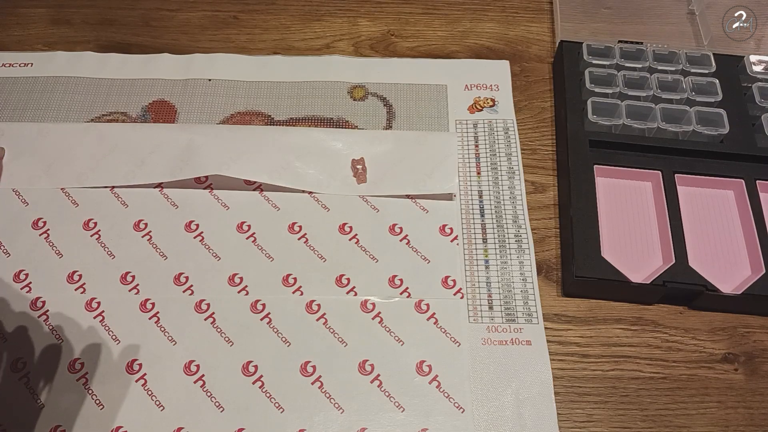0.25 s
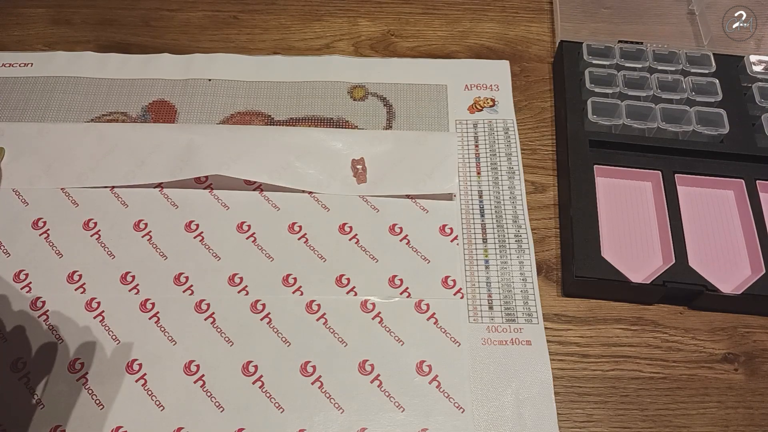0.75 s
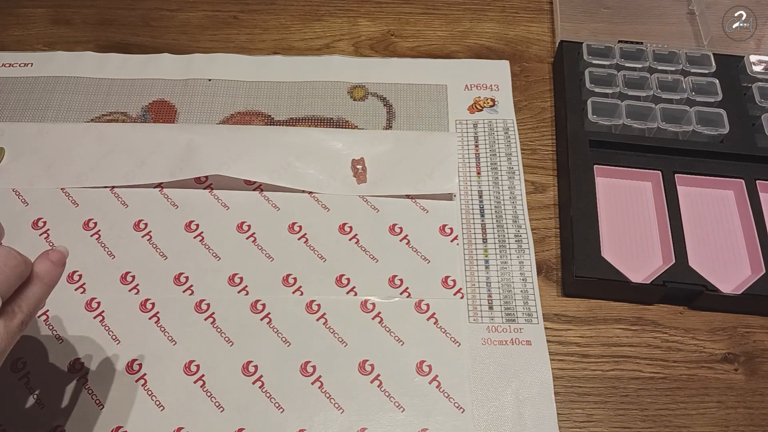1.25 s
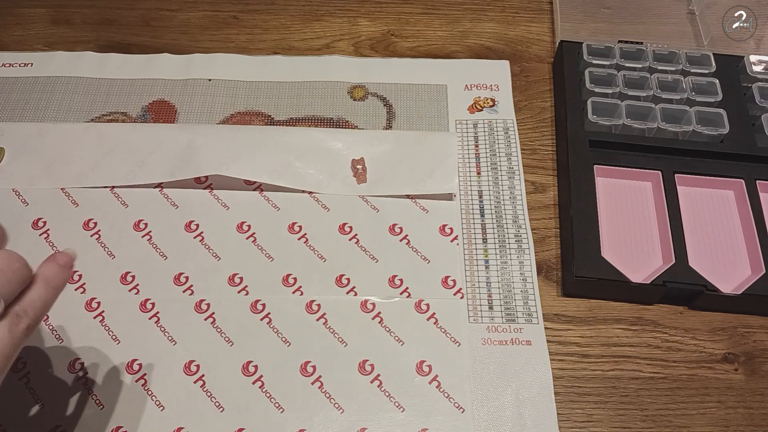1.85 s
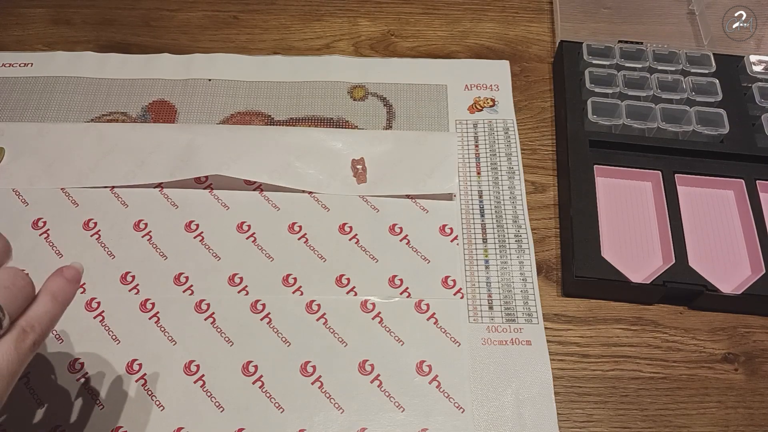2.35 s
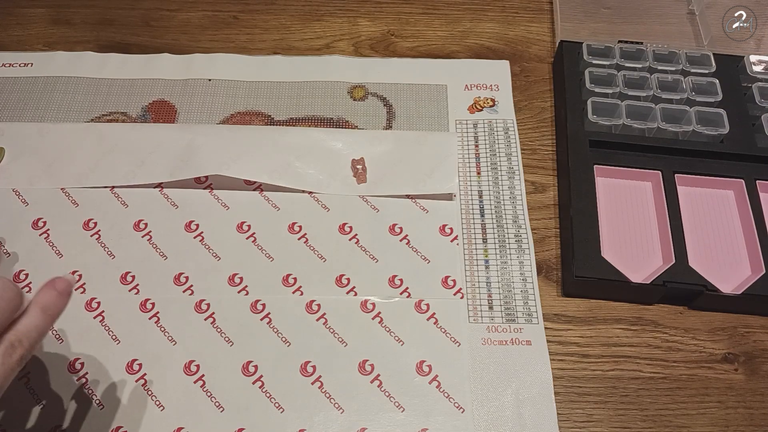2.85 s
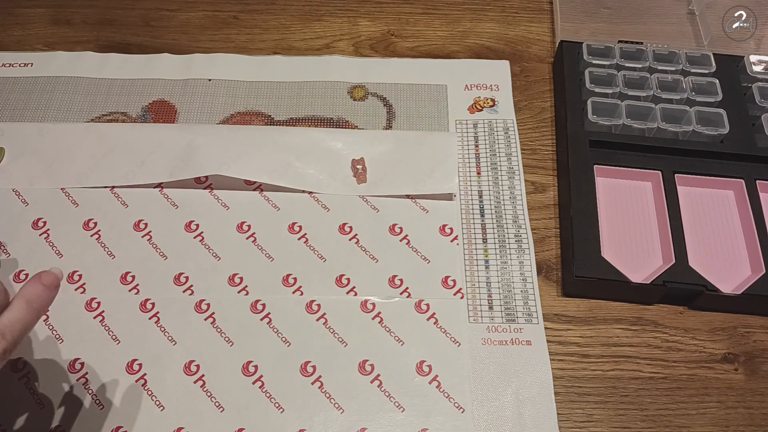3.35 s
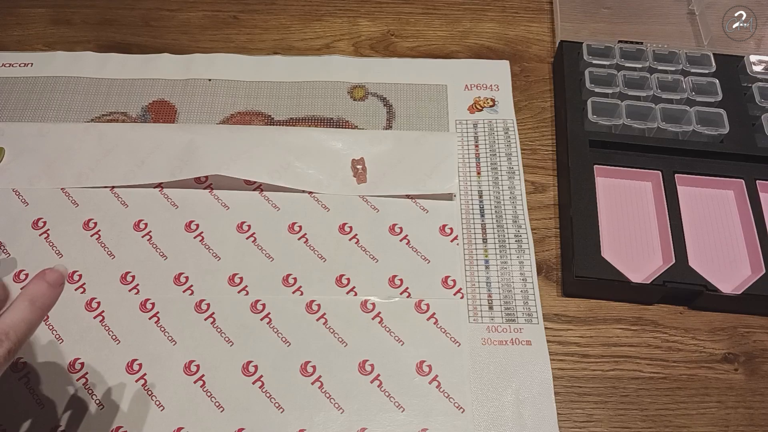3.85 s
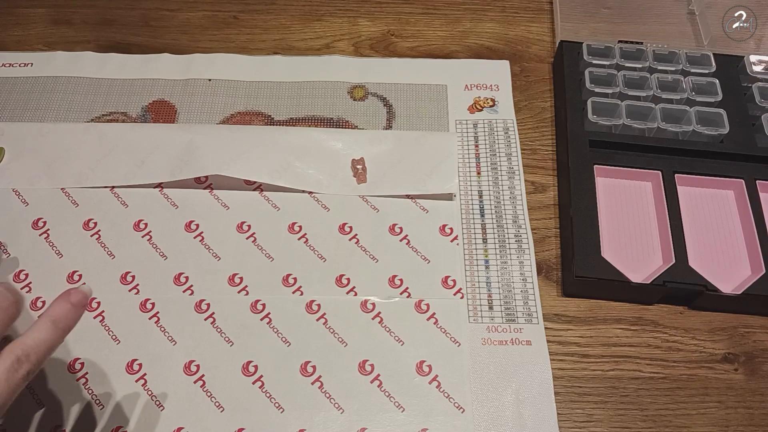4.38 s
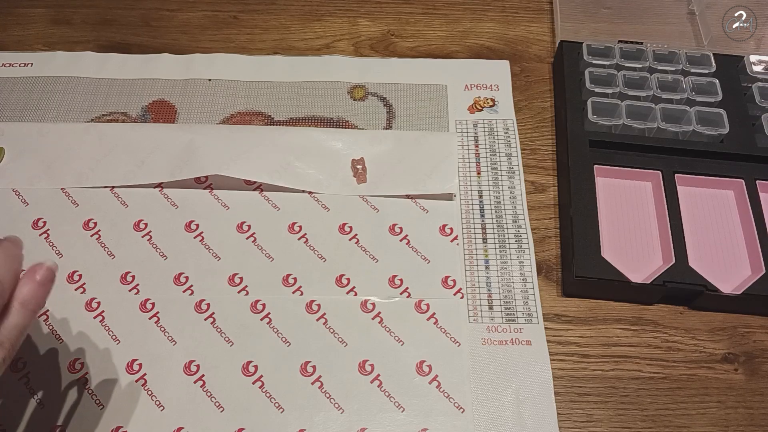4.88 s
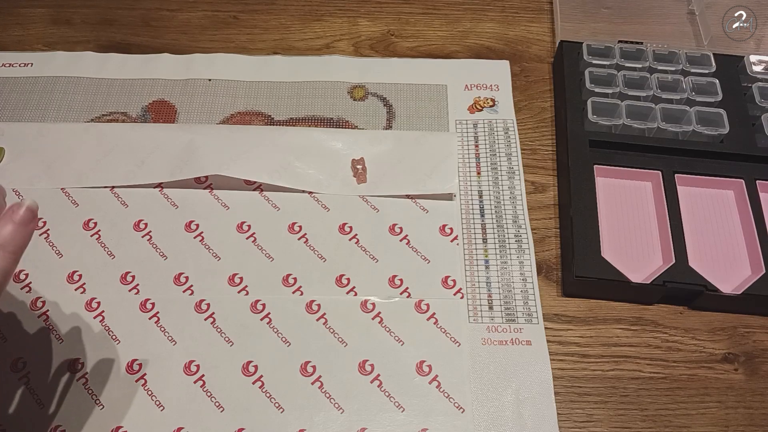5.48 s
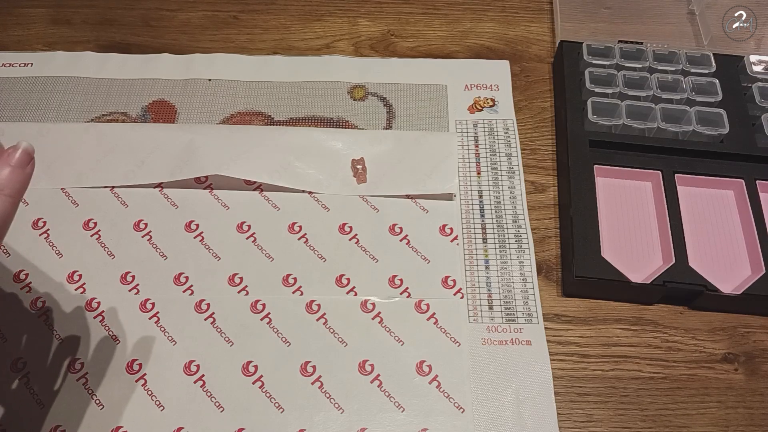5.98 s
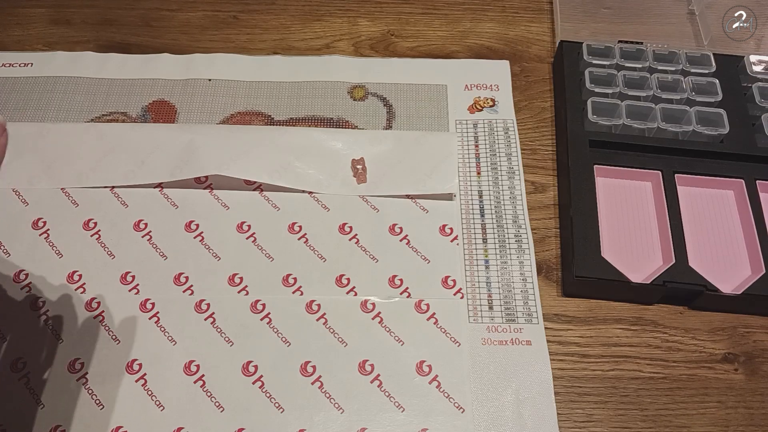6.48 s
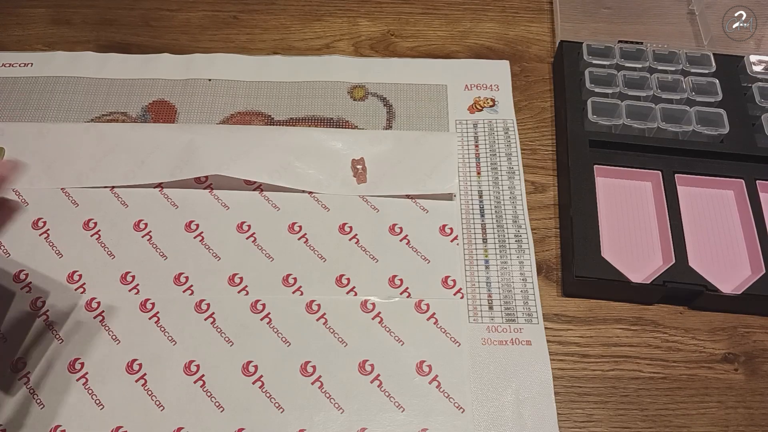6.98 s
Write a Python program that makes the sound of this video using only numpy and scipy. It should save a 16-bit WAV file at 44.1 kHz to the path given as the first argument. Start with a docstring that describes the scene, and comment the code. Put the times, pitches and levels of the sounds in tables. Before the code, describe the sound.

In a quiet room, small hard beads rattle in a shallow plastic tray, picked up close in stereo, slightly off to one side. From 0 to 0.7 s the rattle is light and uneven, with a few separate ticks; between 0.7 and 1.0 s single beads drop and patter. From about 1.1 s the shaking becomes vigorous: dense, bright, crisp clatter in overlapping strokes roughly eight to ten a second, with small plastic taps from tray floor and walls, peaking near 3.0 s. It drops briefly around 4.4 to 4.7 s, then surges again, strongest near 5.1 to 5.2 s. From 5.5 s it weakens, nearly stopping by 6.5 s; a few faint ticks and tiny rustles follow from 6.9 to 7.2 s. Throughout, a faint low motor hum with rumbling air swells about once a second beneath soft, flickering hiss.

```python
"""Rattling plastic beads are the loudest sound: a hand shakes them in a plastic tray, off to one side of two
mic ports. The heap is random contacts, dense on every stroke, each a short noise burst coloured by bead and tray.
Single beads drop in the pauses, each a tick, a tap on the tray and a dull knock in the table.
In another corner of the room a motor hums: sine orders of its turn rate and rumbling air, swelling about
once a second. Faint, flickering room hiss lies under it all."""
import sys
import numpy as np
from scipy import signal
from scipy.fft import rfft, irfft, next_fast_len
from scipy.io import wavfile
from scipy.ndimage import uniform_filter1d, map_coordinates

SR = 44100
rng = np.random.default_rng(int(sys.argv[2]) if len(sys.argv) > 2 else 0)


def wav_record(signal):
    """Record a signal, one row per channel, as 16-bit PCM in the file named by sys.argv[1]."""
    frames = np.transpose(np.atleast_2d(signal))
    bounded = np.clip(frames, -1, 1)
    # unit amplitude maps onto the largest positive 16-bit level
    quanta = np.round(bounded * 32767).astype(np.int16)
    wavfile.write(sys.argv[1], SR, quanta)


N = 318822  # samples

# Strokes of the hand that throw the heap across the tray: crest t/s, relative tick level/dB, settling time/s
HAND_STROKES = [(0.022, -43, 0.11), (0.1, -50, 0.025), (0.211, -46, 0.032), (0.323, -48.5, 0.097),
                (0.401, -46, 0.039), (0.529, -49.5, 0.049), (0.596, -41.5, 0.04), (0.645, -41.0, 0.058),
                (0.78, -52.5, 0.095), (1.012, -42, 0.074), (1.117, -35, 0.052), (1.21, -36, 0.11),
                (1.374, -36, 0.17), (1.492, -42.5, 0.054), (1.64, -35.5, 0.29), (1.79, -38.5, 0.2),
                (1.905, -38, 0.033), (1.985, -36.5, 0.14), (2.174, -37, 0.15), (2.256, -36.5, 0.053),
                (2.323, -36.5, 0.21), (2.513, -35.5, 0.063), (2.637, -35.5, 0.082), (2.819, -38, 0.2),
                (2.95, -41, 0.16), (3.039, -32.5, 0.15), (3.161, -37, 0.065), (3.271, -36.5, 0.053),
                (3.35, -40.5, 0.069), (3.515, -35.5, 0.14), (3.633, -35, 0.13), (3.728, -37, 0.031),
                (3.779, -39, 0.03), (3.861, -38.5, 0.14), (3.992, -38, 0.11), (4.084, -38, 0.101),
                (4.207, -37.5, 0.12), (4.312, -41, 0.085), (4.425, -52, 0.029), (4.534, -53, 0.035),
                (4.69, -49, 0.18), (4.742, -46, 0.034), (4.853, -37.5, 0.11), (4.974, -39.5, 0.084),
                (5.085, -34, 0.067), (5.195, -33, 0.067), (5.31, -37, 0.064), (5.422, -37.5, 0.048),
                (5.526, -40, 0.057), (5.65, -41.5, 0.058), (5.77, -41.5, 0.058), (5.87, -45.8, 0.074),
                (6.0, -51.5, 0.11), (6.117, -49, 0.074), (6.211, -50, 0.066), (6.318, -53.5, 0.118),
                (6.51, -61.7, 0.084), (6.683, -60, 0.055), (6.87, -66, 0.023), (6.932, -50, 0.011),
                (7.005, -55, 0.08), (7.078, -51.5, 0.024), (7.142, -57.5, 0.09), (7.224, -50.7, 0.026)]
# How firmly the heap meets the tray: t/s, then relative level over the ticks/dB of
# floor taps, wall taps and the lowest ring of the tray
TRAY_LOAD = [(0, -6.5, -4.5, -19), (.14, -17.5, -11, -36), (.54, -20, -13.5, -39), (.66, -12, -13, -38),
             (.85, -4.5, -5.5, -28), (1.03, -14, -8.5, -51), (1.12, -5, -9.5, -30.5), (1.7, -7, -8, -24),
             (2.75, -6, -8.5, -24), (3.05, -5.5, -8.5, -21.5), (3.4, -10, -8, -29.5),
             (3.6, -7.5, -8.5, -19.5), (4.3, -7.5, -8.5, -24.5), (4.45, -6, -9.5, -31),
             (4.6, -13.5, -12, -36), (4.8, -8.5, -7, -40), (5.15, -8.5, -6, -24), (5.8, -11.5, -9.5, -29.5),
             (5.92, -20, -11.5, -28), (6.5, -20.5, -15, -30), (6.9, -20, -12, -23), (6.95, -25, -9.5, -24),
             (7.23, -19, -16.5, -25)]
# Single dropped beads: t/s, relative level/dB, tray tap over the tick/dB, dull knock over the tick/dB
BEAD_DROPS = [(0.039, -27, -14, -50), (0.0662, -30, -26, -39), (0.105, -25.5, -22, -44),
              (0.2073, -36, -29, -40), (0.5893, -30, -27, -50), (0.7024, -37, -17, -33),
              (0.7435, -30, -11, -39), (0.765, -32.5, -17, -42), (0.7707, -34, -7, -36),
              (0.7984, -32, -14, -35), (0.8064, -40, -20, -32), (0.811, -31, -14, -29),
              (0.8344, -43, -10, -33), (0.8604, -37, -14, -37), (0.879, -37, -14, -36.5),
              (0.884, -30.5, -12, -39), (0.9198, -32.5, -28, -40), (0.9383, -43, -14, -34),
              (1.0364, -26.5, -5, -45), (1.084, -26, -21, -27), (5.3981, -40, -19, -39),
              (5.5223, -37, -25, -50), (6.57, -42, -37, -33), (6.9231, -30, -32, -20),
              (7.0115, -43, -34, -38), (7.0672, -39, -24, -15), (7.213, -36.5, -29, -32)]

# Colour at each port, as relative spectra: f/Hz, left level/dB, right level/dB
TICK_COLOUR = [(3500, -57, -40), (5080, -7, -6.5), (6250, -2.5, -4.5), (7380, -4, 0.5), (8350, -1, -8),
               (9100, -1.5, -5), (11030, -2.5, -6), (11650, 0, -1), (13100, 2.5, -3), (14400, -1.5, -2.5),
               (15800, -0.5, -3.5)]  # bead on bead
FLOOR_COLOUR = [(1700, -42.5, -54), (1900, -36, -29), (2067, -14.5, -10), (2435, -3, -17.5),
                (2546, 1.5, -5.5), (2926, -2.5, -3.5), (3220, -15, -2.5), (3590, -15, -9), (4250, -37, -44)]  # bead on the tray floor
WALL_COLOUR = [(2800, -54.5, -37.5), (3480, -5.5, -3.5), (3860, -1.5, -5), (4600, -0.5, -1.5),
               (5170, -3, -2), (5730, -24, -6.5), (7100, -37, -34)]  # bead on the tray wall
RING_COLOUR = [(1430, -56, -53), (1660, -25, -18.5), (1795, -10.5, -2.5), (1880, 1, -0.5),
               (2230, -7.5, -10), (2630, -35, -41)]  # lowest ring of the tray
KNOCK_COLOUR = [(300, -40, -40), (700, -30, -11), (1500, 8, 4), (2300, 5, 2), (3500, -30, -36)]  # table under the tray
RUMBLE_COLOUR = [(12, -18, -30), (25, -24, -17), (44, -2, -15), (72, 2.5, 6.5), (111, -1, -13),
                 (174, -10, -22.5), (274, -13, -22), (319, -17, -31), (457, -32.5, -25.5), (900, -66, -70)]  # air noise of the motor
HISS_COLOUR = [(100, 3, -18), (298, 0, -1), (546, 5, 2.5), (1140, 2, 0.5), (2470, 1, 1.5), (5130, -29, -38),
               (10100, 0.5, -10), (15200, -11, -18)]  # air noise of the room

# Likeness of the bead sound at the two ports: f/Hz, likeness (0-1)
PORT_LIKENESS = [(1800, 0.43), (2200, 0.76), (2900, 0.7), (3400, 0.28), (4800, 0.58), (6200, 0.21),
                 (7000, 0.9), (8100, 0.8), (8800, 0.43), (10200, 0.52), (10800, 0.8), (11300, 0.9),
                 (13600, 0.76), (16000, 1)]
# Phase of the left port against the right: f/Hz, phase/rad
PORT_PHASE = [(100, 0), (1120, -1), (1640, -3), (2330, -3.2), (3100, -6.8), (3530, -5.4), (4220, -8.1),
              (5770, -10.5), (6290, -10), (6980, -4 * np.pi), (16200, -4 * np.pi)]

# Motor orders: multiple of the turn rate, left and right rms level/dB before the motor gain,
# swell depth (0-1), polarity
MOTOR_ORDERS = [(1, -61, -66, .25, 1), (2, -56, -64, .25, 1), (3, -49, -57, .3, 1), (4, -62, -71, .25, -1)]
# Steady tone one swell rate below the third order: left and right rms level/dB before the motor gain
BEAT_LEVELS = (-57, -76)
# Background levels over time: t/s, motor gain/dB, hiss level/dB
ROOM_LEVELS = [(0, -0.5, -69), (.9, -1, -70), (1.5, 1.5, -65), (2.2, -1, -66), (3.2, 1.5, -69.5),
               (4, 0.5, -81), (4.7, -3, -71), (5.2, .5, -76), (6, -1.5, -71), (6.9, -2, -70),
               (7.23, -3, -69)]

RISE_SHARE = 0.72  # time scale of a surge's rise, as a share of its settling time
STIR_DB = -69.5  # faint trickle between strokes
# Contact rate at a tick level of REFERENCE_DB, and its exponential growth with harder shaking
CONTACTS_PER_S, REFERENCE_DB, BUSIER_PER_DB = 1900, -41.5, 0.0166
TURN_HZ, SWELL_HZ, SWELL_TOP_S = 24.088, 1.025, 0.341  # turn rate, swell rate, time of a swell's top
RUMBLE_DB = -60.5  # air rumble before swell and motor gain
TOP_HZ = 15740  # upper band limit


def beads():
    """The heap rattles with the shaking; its contacts also tap the tray's floor and walls and ring its body."""
    tick_db = surges()
    floor_db, wall_db, ring_db = curves(TRAY_LOAD)
    busy = CONTACTS_PER_S * np.exp(BUSIER_PER_DB * (tick_db - REFERENCE_DB))
    clumps = amp(2 * 0.62 * wobble(30))  # beads arrive in bunches
    shared = contacts(busy, spread_db=1.0)

    def some(part):
        """Energy of the shared contacts, plus a sparser and more uneven set of one surface's own."""
        own = contacts(part * busy, spread_db=4.0)
        return clumps * (0.53 * shared + 0.48 * own)

    snap = dict(rise=0.0001, t60=0.0035, tail_db=-0.8, tail_t60=0.07)
    ticks = dying(amp(2 * tick_db) * some(0.95), **snap)
    floor = dying(amp(2 * (tick_db + floor_db + 1.22)) * some(0.3),
                  rise=0.00026, t60=0.0055, tail_db=-0.064, tail_t60=0.12)
    walls = dying(amp(2 * (tick_db + wall_db + 2.0)) * some(0.55), **snap)
    ring = dying(amp(2 * (tick_db + ring_db + 3.0)) * some(0.23),
                 rise=0.0004, t60=0.013, tail_db=-1.1, tail_t60=0.076)
    heap = at_ports(ticks, TICK_COLOUR) + at_ports(floor, FLOOR_COLOUR)
    heap = heap + at_ports(walls, WALL_COLOUR) + at_ports(ring, RING_COLOUR)
    return patchy(heap, depth_db=1.35)  # the heap shifts, so the tray's colour wanders


def surges():
    """Level of the ticking in dB: every stroke swells quickly and settles more slowly."""
    crest, db, settle = np.transpose(HAND_STROKES)
    t = np.arange(0, N, 64) / SR
    late = (t[:, None] - crest) / settle
    late = np.where(late < 0, late / RISE_SHARE, late)
    strokes = amp(2 * db) / (1 + late ** 2) ** 3
    energy = strokes.sum(axis=1) + amp(2 * STIR_DB)
    return np.interp(np.arange(N) / SR, t, 10 * np.log10(energy))


def contacts(per_second, spread_db):
    """Random contacts of uneven size whose mean energy per sample is about 1."""
    hit = rng.random(N) < per_second / SR
    size = amp(2 * spread_db * rng.standard_normal(N))
    return hit * size / size.mean() * SR / per_second


def drops():
    """Each dropping bead ticks on beads and wall, taps the tray floor and knocks the table."""
    s, db, tap_db, knock_db = np.transpose(BEAD_DROPS)
    short = dict(rise=0.0008, t60=0.007, tail_db=-3, tail_t60=0.08)
    long = dict(rise=0.0008, t60=0.011, tail_db=-3, tail_t60=0.08)

    def blows(level_db):
        """One impulse of energy at each drop."""
        return np.bincount(np.round(s * SR).astype(int), amp(2 * level_db), N)

    tick = at_ports(dying(blows(db + 9.5), **short), TICK_COLOUR)
    wall = at_ports(dying(blows(db - 3.5), **short), WALL_COLOUR)
    tap = at_ports(dying(blows(db + tap_db + 13.5), **long), FLOOR_COLOUR)
    knock = at_ports(dying(blows(db + knock_db + 14.5), **long), KNOCK_COLOUR)
    return tick + wall + tap + knock


def dying(energy, rise, t60, tail_db, tail_t60):
    """Energy of each contact: a quick snap, then the longer answer of table and walls (times in s)."""
    t = np.arange(SR // 4) / SR
    snap = (1 - np.exp(-t / rise)) * amp(-120 * t / t60)
    tail = amp(-120 * t / tail_t60)
    shape = snap / snap.sum() + amp(2 * tail_db) * tail / tail.sum()
    return np.abs(signal.fftconvolve(energy, shape / shape.sum())[:N])


def at_ports(energy, colour):
    """Noise bursts, part shared by the ports (with a phase between them that varies with pitch), part each's own."""
    m = next_fast_len(N + 8192)
    hz = np.fft.rfftfreq(m, 1 / SR)
    a, b = rfft(np.sqrt(energy) * rng.standard_normal((2, N)), m)
    likeness = np.clip(along(PORT_LIKENESS, hz)[0], 0, 1)
    angle = np.arccos(likeness) / 2  # mixing two noises at +-angle gives this likeness
    left = np.cos(angle) * a + np.sin(angle) * b
    right = np.cos(angle) * a - np.sin(angle) * b
    gain = amp(along(colour, hz)) * (hz < TOP_HZ)
    gain = gain / np.sqrt(np.mean(gain ** 2))
    turn = np.exp(0.5j * along(PORT_PHASE, hz) * [[1], [-1]])
    return irfft(gain * turn * [left, right], m)[:, :N]


def motor():
    """Orders of the turn rate and air rumble swell together; a steady tone beats with the third order."""
    t = np.arange(N) / SR - SWELL_TOP_S
    swell = np.cos(2 * np.pi * SWELL_HZ * t)
    tones = 0
    for k, left, right, depth, sign in MOTOR_ORDERS:
        order = sign * (1 + depth * swell) * np.sin(2 * np.pi * k * TURN_HZ * t)
        tones = tones + amp([[left], [right]]) * order
    beat = amp(BEAT_LEVELS)[:, None] * np.sin(2 * np.pi * (3 * TURN_HZ - SWELL_HZ) * t)
    a, b = rng.standard_normal((2, N))
    noise = np.array([a, 0.27 * a + 0.88 * b])  # the ports share a little of the air noise
    air = unit(filtered(noise, lambda hz: amp(along(RUMBLE_COLOUR, hz))))
    rumble = amp(RUMBLE_DB + 3.3 * swell + 2.7 * wobble(7)) * air
    motor_gain = amp(curves(ROOM_LEVELS)[0])
    return motor_gain * (np.sqrt(2) * (tones + beat) + rumble)  # root 2: rms to peak of a sine


def hiss():
    """Faint coloured noise, each port's own, with flickering level and patches over time and pitch."""
    flicker = amp(3.4 * np.array([wobble(17), wobble(15)]))
    noise = filtered(rng.standard_normal((2, N)), lambda hz: amp(along(HISS_COLOUR, hz)))
    fizz = patchy(noise, depth_db=4.5)
    return amp(curves(ROOM_LEVELS)[1]) * unit(flicker * fizz)


def patchy(x, depth_db):
    """Random patches of gain over time and pitch, the same at both ports."""
    z = signal.stft(x, nperseg=256)[2]
    field = rng.standard_normal(z.shape[1:])
    field = uniform_filter1d(field, 5, 0)  # smooth over pitch
    field = uniform_filter1d(field, 16, 1)  # smooth over time
    gain = amp(depth_db * unit(field))
    gain = gain / np.sqrt(np.mean(gain ** 2))
    return signal.istft(z * gain, nperseg=256)[1][:, :N]


def wobble(rate):
    """A smooth random curve, rate knots a second."""
    knots = rng.standard_normal(int(N * rate / SR) + 4)
    return map_coordinates(knots, [np.arange(N) * rate / SR])


def curves(rows):
    """One value per sample for each column after the time."""
    s, *cols = np.transpose(rows)
    return [np.interp(np.arange(N) / SR, s, c) for c in cols]


def along(points, hz):
    """Each column after f/Hz, read on a log frequency axis."""
    f, *cols = np.transpose(points)
    return np.array([np.interp(np.log(hz + 1), np.log(f + 1), c) for c in cols])


def filtered(x, response):
    """x times a response of frequency."""
    m = next_fast_len(N + 8192)
    return irfft(rfft(x, m) * response(np.fft.rfftfreq(m, 1 / SR)), m)[..., :N]


def amp(db):
    """Gain of a level in dB."""
    return 10 ** (np.asarray(db) / 20)


def unit(x):
    """x at rms 1."""
    return x / np.sqrt(np.mean(x ** 2) + 1e-20)


def scene():
    """All sources at the two ports."""
    return beads() + drops() + motor() + hiss()


def record(dry):
    """Nothing is kept above the band limit."""
    return filtered(dry, lambda hz: hz < TOP_HZ)


dry = scene()
out = record(dry)
wav_record(out)
```